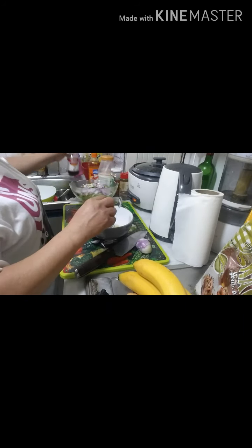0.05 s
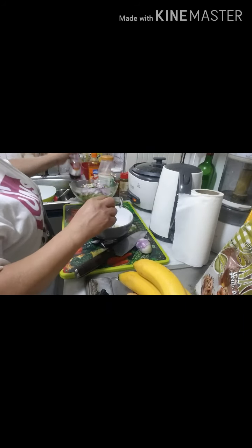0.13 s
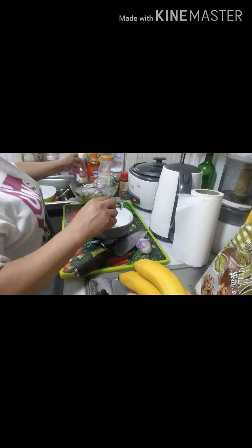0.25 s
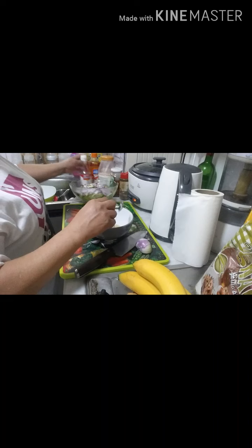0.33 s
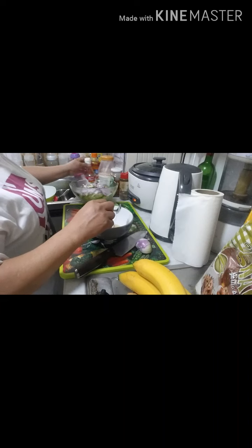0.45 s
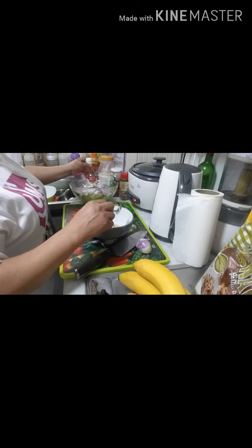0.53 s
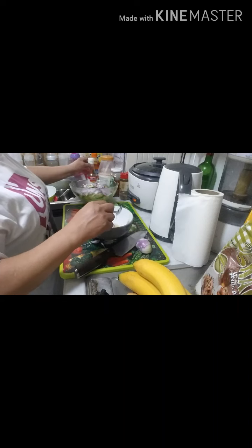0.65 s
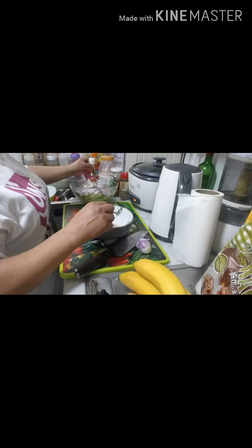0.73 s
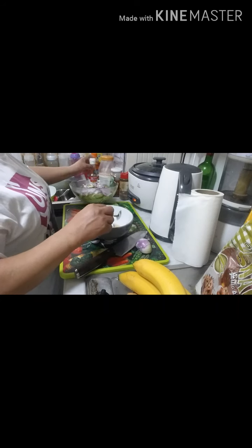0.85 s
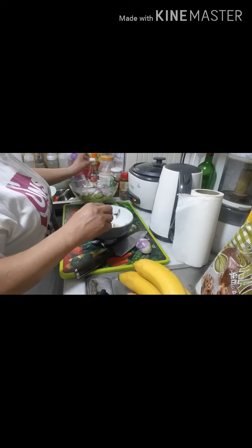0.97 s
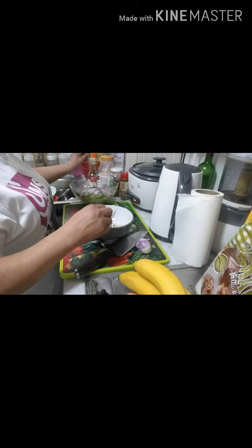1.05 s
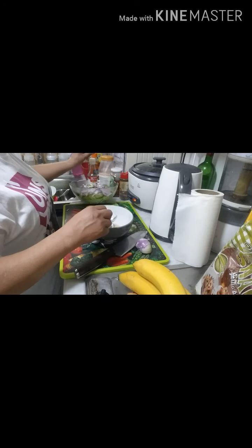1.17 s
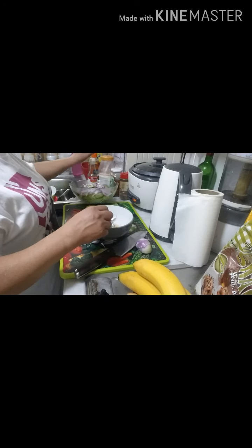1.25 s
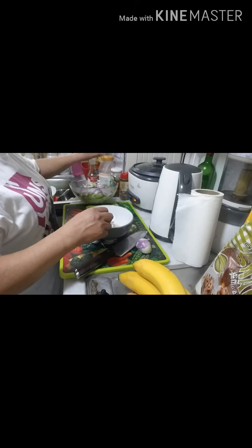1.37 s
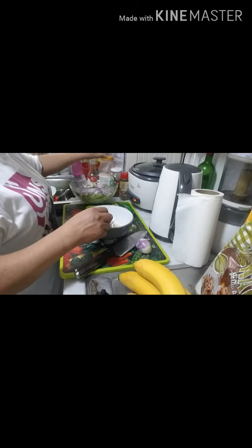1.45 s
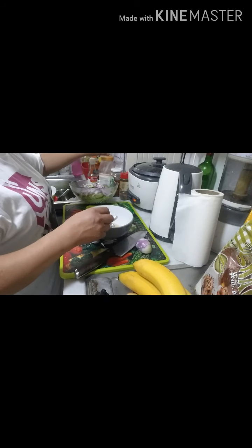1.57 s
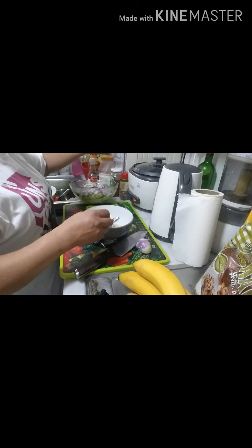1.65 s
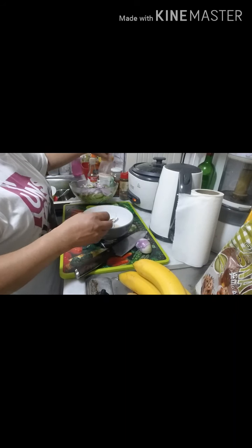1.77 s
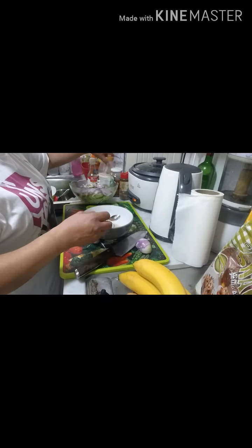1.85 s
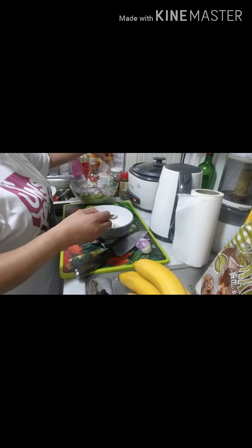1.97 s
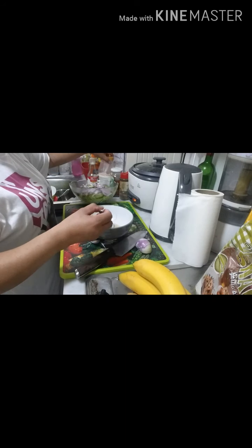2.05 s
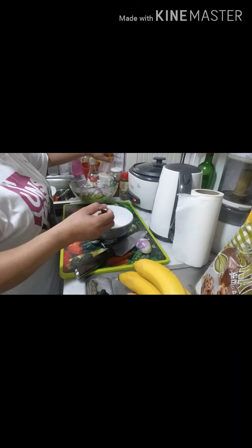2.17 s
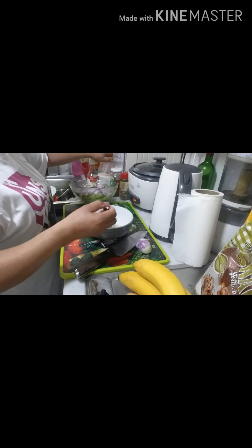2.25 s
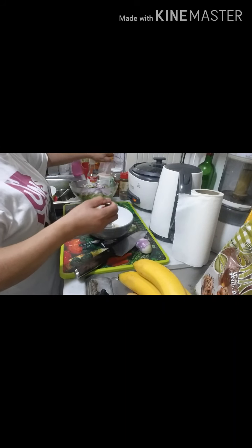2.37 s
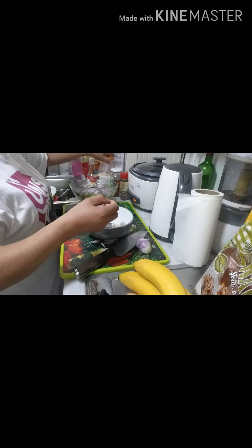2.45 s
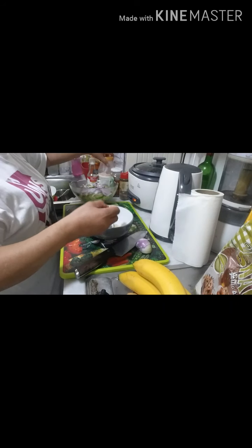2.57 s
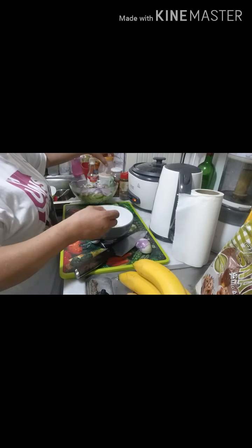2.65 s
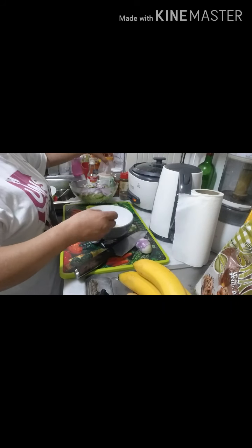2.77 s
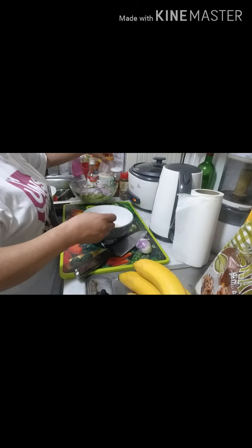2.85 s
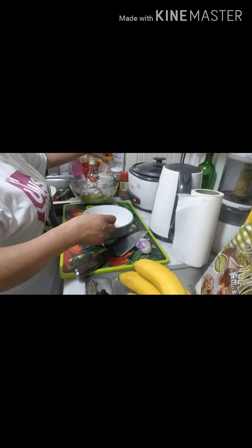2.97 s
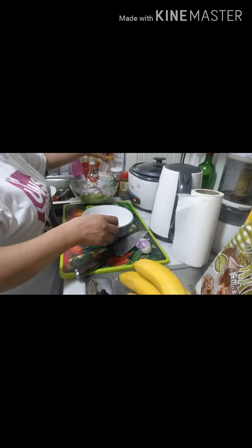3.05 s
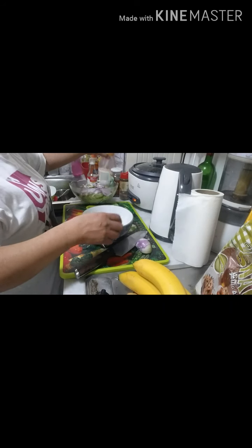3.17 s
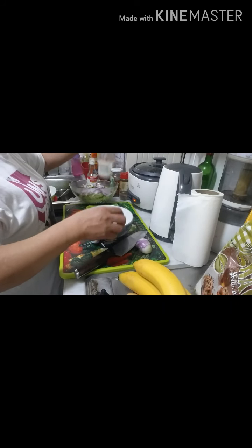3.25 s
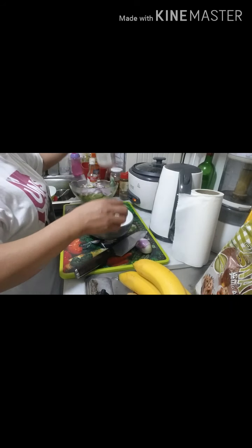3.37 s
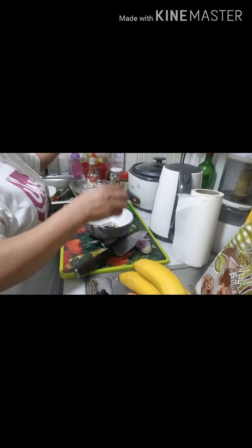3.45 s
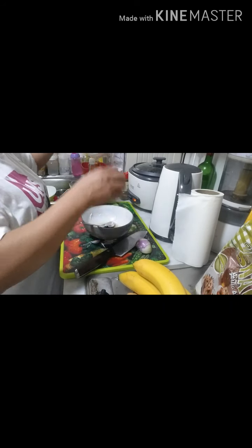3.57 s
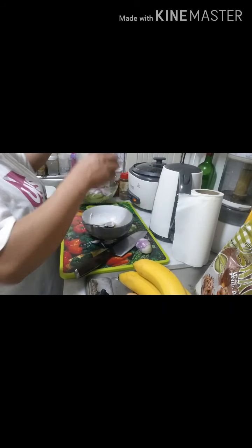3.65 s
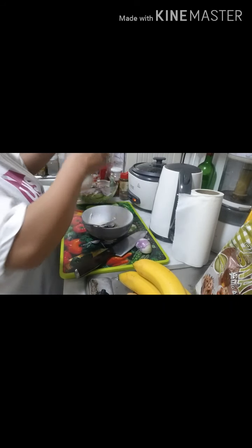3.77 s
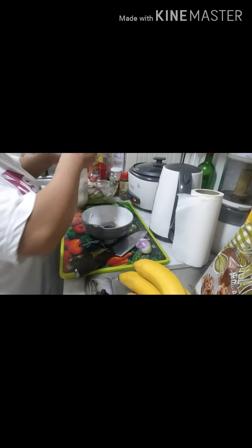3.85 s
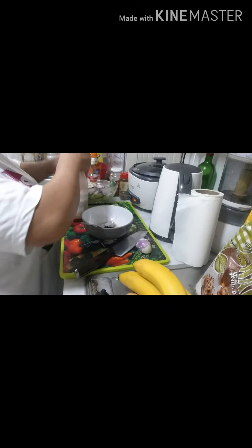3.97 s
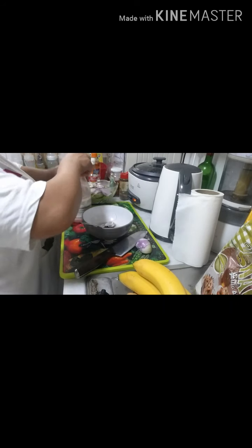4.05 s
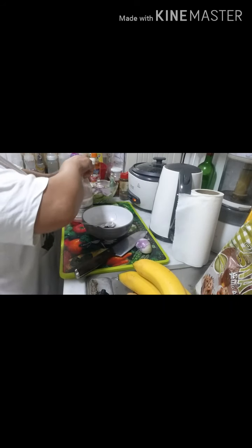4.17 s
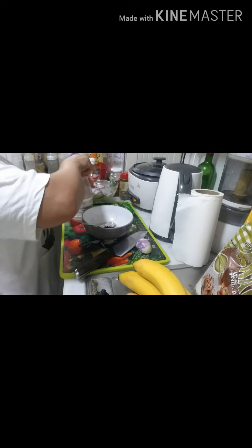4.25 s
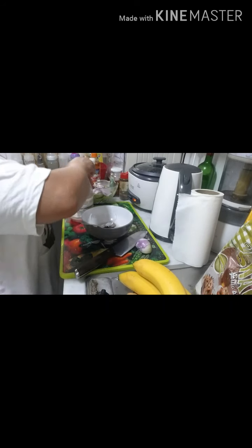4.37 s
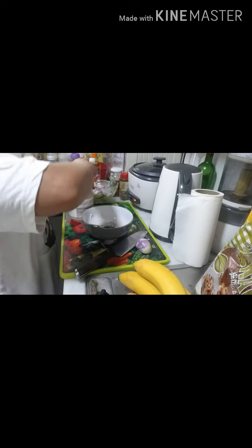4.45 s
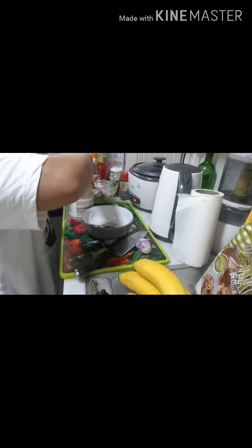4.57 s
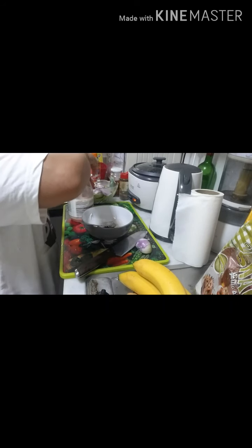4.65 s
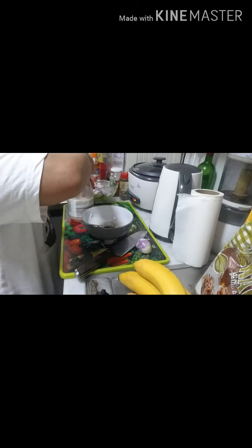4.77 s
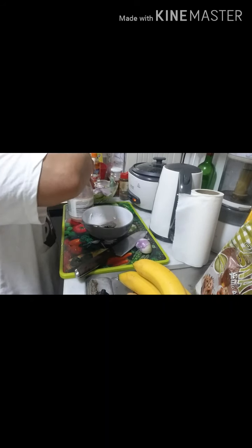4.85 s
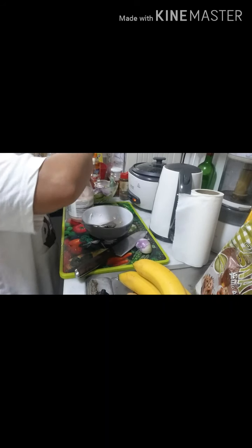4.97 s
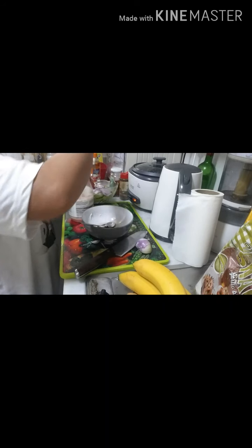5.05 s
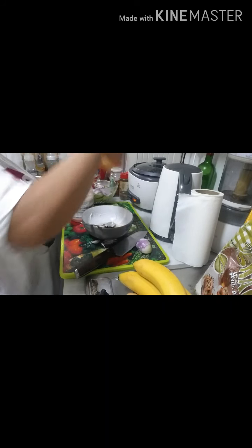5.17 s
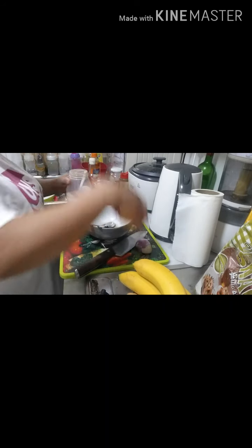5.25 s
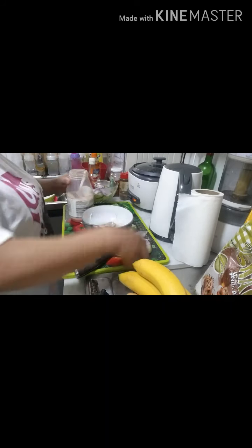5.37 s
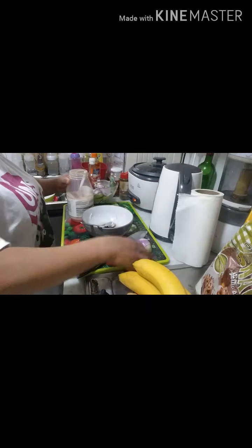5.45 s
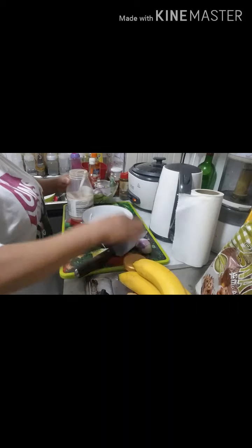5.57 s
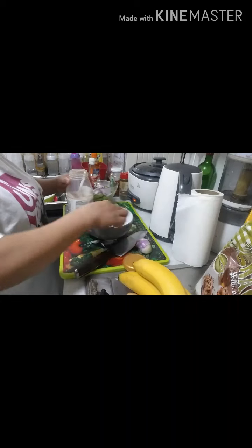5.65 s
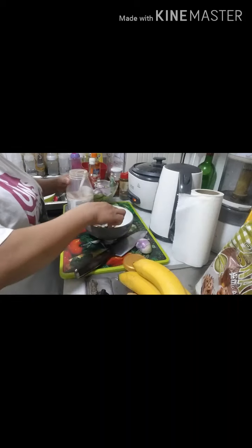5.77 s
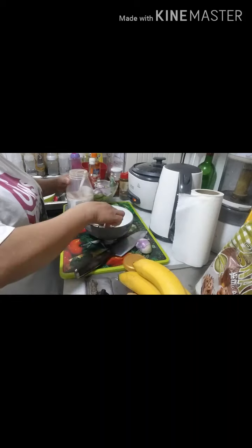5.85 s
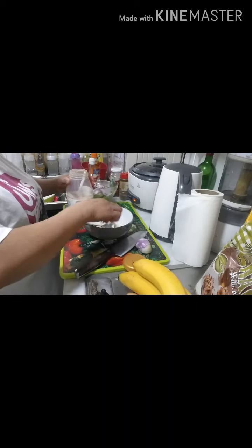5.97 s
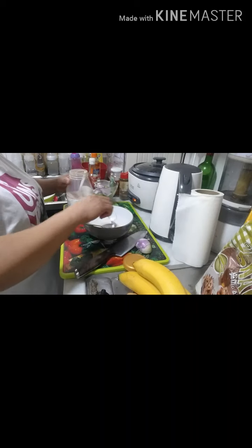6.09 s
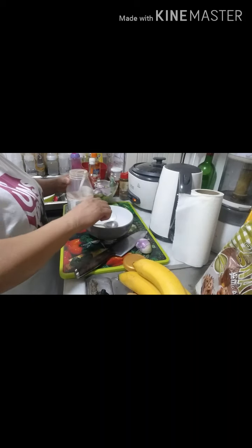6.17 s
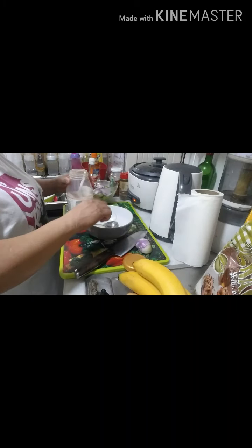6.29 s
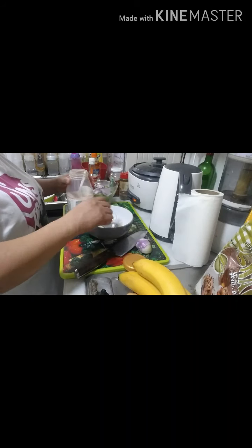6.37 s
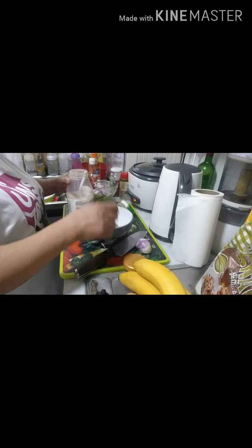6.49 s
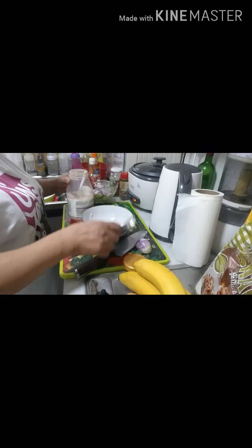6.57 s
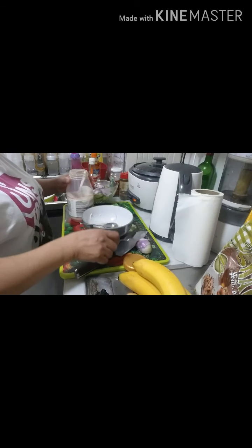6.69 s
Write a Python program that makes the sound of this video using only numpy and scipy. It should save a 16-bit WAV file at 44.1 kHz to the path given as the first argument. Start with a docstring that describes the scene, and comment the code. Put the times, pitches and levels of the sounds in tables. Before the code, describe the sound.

An appliance hums steadily in a small, hard-walled kitchen. Glass seasoning bottles knock softly on the counter, then a metal spoon rattles brightly in a small bowl, close to the microphone. A jar thuds down and jolts the spoon. A scoop hisses twice through grains, a hard lid clacks down, and the spoon clinks in the bowl again.

```python
"""A small, hard-walled kitchen, where a dressing is mixed at the counter while an appliance hums.
A scoop hisses through grains, a hard lid clacks down, and seasoning bottles knock on the counter with
a thud and a hollow note. Up front a metal spoon rattles into a small bowl, each contact ringing both.
A jar set down jolts the spoon, and at the end it clinks in the bowl again."""
import sys
import numpy as np
from scipy import signal
from scipy.fft import rfft, irfft
from scipy.io import wavfile
from scipy.ndimage import uniform_filter1d

SR = 44100
rng = np.random.default_rng(int(sys.argv[2]) if len(sys.argv) > 2 else 0)


def unload_wav(signal):
    """Save mono or channel-first audio to the path in sys.argv[1] as 16-bit WAV at rate SR, clipped to [-1, 1]."""
    wavfile.write(
        sys.argv[1],
        SR,
        np.round(np.clip(np.atleast_2d(signal).T, -1, 1) * 32767).astype(np.int16),
    )


N = 296604
SIZE = 18432  # samples in one hit with its room tail
HZ, T = np.fft.rfftfreq(SIZE, 1 / SR), np.arange(SIZE) / SR


def amp(db):
    """Decibels to gain."""
    return 10 ** (np.asarray(db) / 20)


def unit(x):
    """Scales to rms 1."""
    return x / np.sqrt(np.mean(abs(x) ** 2) + 1e-20)


def curve(points, hz):
    """Reads a table of breakpoints on a log-frequency axis."""
    point_hz, value = np.transpose(points)
    return np.interp(np.log(hz + 1), np.log(point_hz + 1), value)


def add(mix, start_s, sound):
    """Mixes a stereo sound in at start_s."""
    part = mix[:, round(start_s * SR):][:, :sound.shape[1]]
    part += sound[:, :part.shape[1]]


def causal(gain):
    """The minimum-phase filter with this gain: nothing sounds before the blow."""
    cepstrum = irfft(np.log(np.maximum(gain, 1e-5)))
    return np.exp(rfft(cepstrum * (1 + np.sign(np.fft.fftfreq(SIZE)))))


def one_shot(spectrum):
    """A hit as a waveform with a faded tail; a unit spectrum holds the energy of 25 ms at full level."""
    return irfft(spectrum) * np.sqrt(.025 * SR) * np.clip((.39 - T) / .06, 0, 1)


def pan(lean_db):
    """Constant-power stereo gains; positive leans left."""
    gains = amp(np.array([lean_db, -lean_db]) / 2)
    return gains / np.sqrt(np.mean(gains ** 2, 0))


# stereo balance, furthest right in two treble bands: freq_hz, left_minus_right_db
BALANCE = [(100, -4), (300, -1), (1200, 0), (2500, -1), (3300, -3), (4300, -9), (5200, -4), (6400, -13),
           (7600, -4), (8800, 0), (11500, -3), (15000, -6)]
def placement(hz, amount=1):
    """Pans each frequency to its place in the image."""
    return pan(amount * curve(BALANCE, hz))


def colour(points):
    """A broad, causal EQ, placed in the stereo image."""
    return unit(causal(amp(curve(points, HZ)) * placement(HZ)))


# how alike left and right are: freq_hz, correlation
STEREO_LIKENESS = [(100, 0.98), (300, 0.92), (700, 0.59), (1700, -0.00073), (2500, -0.27), (3300, 0.11),
                   (15000, -0.08)]
def stereo_width(spectra, hz):
    """Long waves reach both sides alike, short waves differently."""
    same = np.clip(curve(STEREO_LIKENESS, hz), -1, 1)
    return np.array([spectra[0], same * spectra[0] + np.sqrt(1 - same ** 2) * spectra[1]])


# the kitchen's reverb time: freq_hz, t60_s
ROOM_DECAY = [(150, 0.32), (500, 0.25), (1500, 0.21), (4000, 0.25), (8000, 0.23), (15000, 0.21)]
def kitchen(direct=0.59, direct_s=0.0005, build_s=0.0042):
    """Spectrum of one path through the room: a burst off the counter, then dense reflections off tiles."""
    taps = rng.standard_normal((2, SIZE)) * (rng.random(SIZE) < .3)
    hz, t, bands = signal.stft(taps, SR, nperseg=256)
    decay = amp(-60 * t / curve(ROOM_DECAY, hz)[:, None])
    tail = signal.istft(bands * decay, SR, nperseg=256)[1][:, :SIZE]
    tail *= 1 - np.exp(-T / build_s)
    burst = rng.standard_normal((2, SIZE)) * np.exp(-T / direct_s)
    return unit(stereo_width(rfft(direct * unit(burst) + unit(tail)), HZ))


def contact(length_s, bounce, rebounds_per_s=700, fade_db=0):
    """Spectrum of a blow and the smaller rebounds that follow while the contact lasts."""
    force = bounce * rng.uniform(-1.26, 1, SIZE)
    force *= (rng.random(SIZE) < rebounds_per_s / SR) & (T < length_s)
    force *= amp(fade_db * np.minimum(T / length_s, 1))
    force[0] = 1
    return rfft(force)


def ring(blow, modes, tilt_db_per_octave=0):
    """The blow sets modes (pitch_hz, level_db, t60_s) ringing; tilt favours the high ones."""
    hz, db, t60_s = np.transpose(modes)
    width_hz = np.log(1000) / np.pi / t60_s[:, None]
    resonances = 1j * HZ * width_hz / (hz[:, None] ** 2 - HZ ** 2 + 1j * HZ * width_hz)
    mode_rms = np.sqrt(abs(blow) ** 2 @ abs(resonances.T) ** 2 / len(HZ))
    gains = amp(db + tilt_db_per_octave * np.log2(hz / 4300)) * placement(hz)
    return blow * ((gains / mode_rms) @ resonances)


MOTOR_PITCHES = [100.0, 116.2, 132.35, 148.5, 164.6, 200.0, 232.3, 283.5]  # the hum and its beating sidebands: pitch_hz
MOTOR_LEVELS = [-36, -52, -44.5, -49.5, -65.5, -58.5, -59.5, -66]  # each of those tones: level_db
FAN_EQ = [(20, -7), (45, -3), (80, 4.5), (140, 6), (190, -6), (280, -3.5), (400, -11.5), (550, -18),
          (1200, -23), (2600, -26.5), (3600, -30.5), (8000, -30), (10000, -28.5), (15400, -33.5)]  # the rush of air: freq_hz, gain_db
FAN_PEAKS = [(674, 66, -67, -5.5), (2500, 590, -62, -2), (5226, 360, -68.5, -12), (6640, 650, -66.5, -18)]  # the fan's whine: centre_hz, width_hz, level_db, left_minus_right_db
def appliance(rush_db=-45, hum_lean_db=-5.0):
    """The bed: a motor hums under the rush of its fan, which has a few broad resonances."""
    t, hz = np.arange(N) / SR, np.fft.rfftfreq(N, 1 / SR)
    hum = sum(amp(db) * np.sqrt(2) * np.sin(2 * np.pi * (pitch_hz * t + rng.random()))
              for pitch_hz, db in zip(MOTOR_PITCHES, MOTOR_LEVELS))
    noise = stereo_width(rfft(rng.standard_normal((2, N))), hz)
    fan = amp(rush_db) * unit(irfft(noise * amp(curve(FAN_EQ, hz)) * placement(hz, amount=0.32), N))
    for centre_hz, width_hz, db, lean_db in FAN_PEAKS:
        peak = 1 / (1 + (2 * (hz - centre_hz) / width_hz) ** 2)
        whine = unit(irfft(rfft(rng.standard_normal((2, N))) * peak, N))
        fan += amp(db) * pan(lean_db)[:, None] * whine
    return fan + hum * pan(hum_lean_db)[:, None]


SCOOP_STROKES = [(4.42, 0.2, -40, -30), (4.834, 0.18, -38, -50)]  # digs into the jar: start_s, length_s, grains_db, final_scrape_db
GRAIN_EQ = [(300, -30.5), (1000, 1), (2500, 7.5), (4500, 3), (7000, 2), (11000, -2.5), (15000, -5)]  # bright hiss of sliding grains: freq_hz, gain_db
SCRAPE_EQ = [(150, -18), (400, -2.5), (1000, -1.5), (1700, -3.5), (3500, -8), (7000, -15.5), (15000, -21)]  # darker rub on the jar wall: freq_hz, gain_db
def scoop(grains_per_s=3000, attack_s=0.0039, release_s=0.0075, swell_db=24):
    """Many tiny grain collisions hiss while the scoop rubs ever harder on the wall of the jar."""
    out, t = np.zeros((2, N)), np.arange(SR // 2) / SR
    for start_s, length_s, grains_db, scrape_db in SCOOP_STROKES:
        stroke = np.minimum(t / attack_s, 1) * np.exp(-np.maximum(t - length_s, 0) / release_s)
        press_db = swell_db * np.minimum(t / length_s - 1, 0)
        for db, eq in ((grains_db, GRAIN_EQ), (scrape_db + press_db, SCRAPE_EQ)):
            clicks = unit(rng.standard_normal(len(t)) * (rng.random(len(t)) < grains_per_s / SR))
            response = irfft(colour(eq) * kitchen())
            add(out, start_s, signal.oaconvolve((clicks * stroke * amp(db))[None], response, axes=1))
    return amp(-5.5) * out


LID_LANDINGS = [(5.5104, -16.5, -16, 2060), (5.5193, -45, -14.5, 7500)]  # edge first, then flat: start_s, ring_db, clack_db, lowpass_hz
LID_MODES = [(585, -7, 0.007), (1277, -1, 0.013), (2180, -6, 0.03), (3960, -9, 0.026), (4530, -22, 0.03),
             (6170, 0, .025)]  # the lid's short ring: pitch_hz, level_db, t60_s
CLACK_EQ = [(120, -53), (350, -5), (800, -9), (1400, 3.5), (3000, 4.5), (6500, 3.5), (10000, -8.5),
            (15000, -23)]  # its hard attack: freq_hz, gain_db
def lid():
    """A hard lid clacks down with hardly any ring."""
    out, clack = np.zeros((2, N)), colour(CLACK_EQ)
    for start_s, ring_db, clack_db, lowpass_hz in LID_LANDINGS:
        blow = kitchen(direct=0.61, direct_s=0.0018)
        lowpass = causal((1 + (HZ / lowpass_hz) ** 4) ** -.5)
        hit = amp(ring_db) * ring(blow, LID_MODES) + amp(clack_db) * blow * clack
        add(out, start_s, one_shot(lowpass * hit))
    return amp(-3.5) * out


COUNTER_MODES = [(138.9, 3, 0.084), (340, -11, 0.03), (720, -11, 0.018), (1010, -10, 0.016),
                 (1160, -33, 0.022), (1450, -36, 0.033), (1640, -14.5, 0.02)]  # the counter and what stands on it: pitch_hz, level_db, t60_s
THUD_EQ = [(60, -20), (150, 4), (500, 6.5), (1200, 3.5), (2500, -1), (6000, 5.5), (15000, -5)]  # glass meeting the counter: freq_hz, gain_db
def knock(db, hollow_db, lowpass_hz, hollow_hz=527, hollow_t60_s=0.03):
    """Glass knocks on the counter and sounds its hollow note; heavy blows are short and reach lower."""
    softer_db = -33.5 - db  # how far below a middling knock
    highpass_hz = 316 * 2 ** (softer_db / 24.5)
    contact_s = .006 * 2 ** (softer_db / 21)
    blow = unit(contact(contact_s, bounce=0.63) * kitchen(direct=0.63, direct_s=0.0035))
    band = causal(((1 + (highpass_hz / (HZ + 1)) ** 6) * (1 + (HZ / lowpass_hz) ** 6)) ** -.5)
    counter = amp(-5) * ring(blow, COUNTER_MODES)
    hollow = ring(blow, [(hollow_hz, hollow_db, hollow_t60_s)])
    return amp(db) * one_shot(unit(band * (blow * colour(THUD_EQ) + counter + hollow)))


BOTTLE_KNOCKS = [(0.489, -44, -8, 3550), (0.626, -35, 1.5, 14000), (.651, -26.5, -5.5, 970),
                 (.901, -32, -3, 1010), (.919, -30, -7, 2800), (1.004, -40, -11, 950),
                 (2.183, -41, -18, 950), (2.307, -37, -6, 1203), (2.332, -44.5, -1, 14870),
                 (2.595, -45, -17, 3500), (4.1505, -15.5, -37, 2070), (4.159, -10, -18, 2450),
                 (4.633, -41.5, -18, 850), (4.812, -31.5, -30, 3600), (4.966, -34, -6, 2640),
                 (4.983, -29.5, -15, 2420)]  # glass bumped or set down: start_s, level_db, hollow_db, lowpass_hz
GRIP_SHIFTS = [(.185, .26), (.56, 0.77), (1.92, 2.28)]  # fingers moving on a bottle: start_s, end_s
def bottles(touch_gap_s=.08, touch_db=-49):
    """Bottles and jars knock on the counter, with faint, uneven touches while one is in hand."""
    out = np.zeros((2, N))
    for start_s, db, hollow_db, lowpass_hz in BOTTLE_KNOCKS:
        add(out, start_s, knock(db, hollow_db, lowpass_hz))
    for start_s, end_s in GRIP_SHIFTS:
        for slot_s in np.arange(start_s, end_s, touch_gap_s):
            touch_s = slot_s + touch_gap_s * rng.random() / 2
            add(out, touch_s, knock(touch_db + rng.standard_normal(), hollow_db=-6, lowpass_hz=7000))
    return amp(-4.5) * out


def overtones(depth_db=7.5, width_bins=32):
    """Crowded high modes of the metal: narrow peaks and gaps that depend on the spot struck."""
    ripple = uniform_filter1d(rng.standard_normal(len(HZ)), width_bins)
    ripple = unit(uniform_filter1d(ripple, width_bins))
    treble = HZ ** 2 / (HZ ** 2 + 3500 ** 2)
    return causal(amp(depth_db * ripple * treble))


BOWL_PITCHES = [1035, 2491, 4308, 4338, 4495, 6457, 6558, 8871, 11551, 11744, 14948]  # the bowl's modes: pitch_hz
BOWL_RINGS = [(-14, 0.21), (-14, 0.12), (-7.5, 0.16), (-8.5, 0.11), (-23.5, 0.1), (-11, 0.12), (-24, 0.11),
              (-18, 0.1), (-30, 0.14), (-29.5, .15), (-30, 0.14)]  # how each one rings: level_db, t60_s
def bowl_ring(blow, strength_db, low_note_db, firm_db=-12):
    """The bowl rings brighter the harder it is struck."""
    modes = np.column_stack([BOWL_PITCHES, BOWL_RINGS])
    modes[0, 1] += low_note_db  # the spot struck decides how well the lowest mode speaks
    return ring(blow, modes, tilt_db_per_octave=3 + 0.189 * (strength_db - firm_db))


SPOON_PITCHES = [3812, 4200, 6004, 6243, 6620, 6757, 6976, 7440, 7655, 8900, 9245, 9590, 10090, 10310,
                 12200, 14100, 15340]  # the spoon's modes: pitch_hz
SPOON_RINGS = [(-48, 0.05), (-59, 0.056), (-24, 0.099), (-28, .15), (-7, 0.027), (-21, 0.056), (-14, 0.022),
               (-14, 0.013), (-23, 0.017), (-16.5, 0.015), (-20, 0.077), (-15.5, 0.15), (-30, 0.046),
               (-14, 0.013), (-17, 0.042), (-17, .07), (-28, .1)]  # how each one rings before damping: level_db, t60_s
def spoon_ring(blow, detune=.003, spread_db=5.0, longest_t60_s=.085):
    """The spoon's high modes shift in pitch and level from one contact to the next."""
    modes = np.column_stack([SPOON_PITCHES, SPOON_RINGS])
    modes[:, 0] *= 1 + detune * rng.standard_normal(len(modes))
    modes[:, 1] += spread_db * rng.standard_normal(len(modes))
    modes[:, 2] = np.minimum(modes[:, 2], longest_t60_s)  # the dressing damps the spoon
    return ring(blow, modes)


# the spoon's hits on the bowl: start_s, level_db, bowl_db, spoon_db, low_note_db, skitter_s
SPOON_HITS = [(2.9706, -17.5, 11, 10, 0.5, 0.018), (3.019, -20.5, 4.5, -21, 2, 0.018),
              (3.104, -19, 9, -25, -1, 0.0074), (3.12, -13.5, 4.5, 5.5, 3.5, 0.065),
              (3.211, -10.5, 6, 8.5, 11, 0.034), (3.271, -16.5, 10, 13, 6, 0.073),
              (3.366, -16, 4, 0.5, -3, 0.032), (3.444, -21.5, 10, -1, -6.5, 0.039),
              (4.161, -10, 4.5, -14, -7, 0.057), (5.915, -44.5, 9.5, -29, -12, 0.045),
              (6.013, -33, 5, -2, 4, .012), (6.0803, -20, 8.5, -30, -1.5, 0.047),
              (6.174, -30, 8.5, -30, -3, 0.0071), (6.26, -32, 10.5, -26, 4, 0.12),
              (6.3167, -14.5, 15.5, 1.5, 0.5, 0.05), (6.363, -13, 8, 6, 5, .075)]
TICK_EQ = [(100, -0.5), (400, -7.5), (800, -5.5), (1400, 8.5), (2000, 0), (2650, 12), (3200, 5), (4400, 2),
           (5300, 2.5), (6700, 1), (8300, -6.5), (10000, 2.5), (12800, -7.5), (15400, -0.5)]  # the bare contact: freq_hz, gain_db
def spoon_in_bowl():
    """The spoon strikes and skitters on; each contact ticks and rings both bowl and spoon."""
    out, tick_colour = np.zeros((2, N)), colour(TICK_EQ)
    for start_s, db, bowl_db, spoon_db, low_note_db, skitter_s in SPOON_HITS:
        skitter = contact(skitter_s, bounce=0.53, rebounds_per_s=450, fade_db=-3)
        blow = unit(skitter * kitchen(direct=0.34))
        bowl = amp(bowl_db) * bowl_ring(blow, db, low_note_db)
        spoon = amp(spoon_db) * spoon_ring(blow)
        tick = unit(blow * tick_colour * overtones())
        add(out, start_s, amp(db) * one_shot(bowl + spoon + tick))
    return amp(-6) * out


def scene():
    """The action on the counter over the appliance's hum."""
    return spoon_in_bowl() + bottles() + lid() + scoop() + appliance()


def record(dry, threshold_db=-21, squeeze=0.32, release_db_per_s=40, lowpass_hz=15550):
    """A gentle limiter leans on the loudest hits, then a steep low-pass trims the top."""
    power_db = 10 * np.log10(abs(uniform_filter1d((dry ** 2).mean(0), size=256)) + 1e-12)
    fall_db = np.arange(N) / SR * release_db_per_s
    held_db = np.maximum.accumulate(power_db + fall_db) - fall_db
    over_db = np.maximum(held_db - threshold_db, 0)
    limited = dry * amp(-squeeze * uniform_filter1d(over_db, size=128))
    lowpass = signal.firwin(511, lowpass_hz, window=("kaiser", 9), fs=SR)
    return signal.oaconvolve(limited, lowpass[None], "same")


dry = scene()
out = record(dry)
unload_wav(out)
```